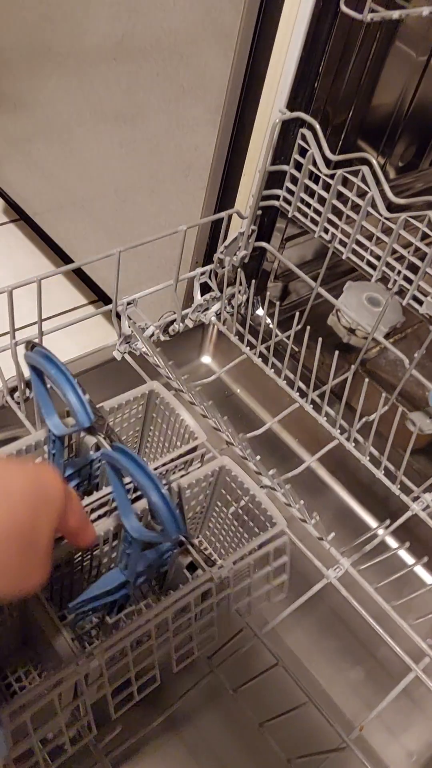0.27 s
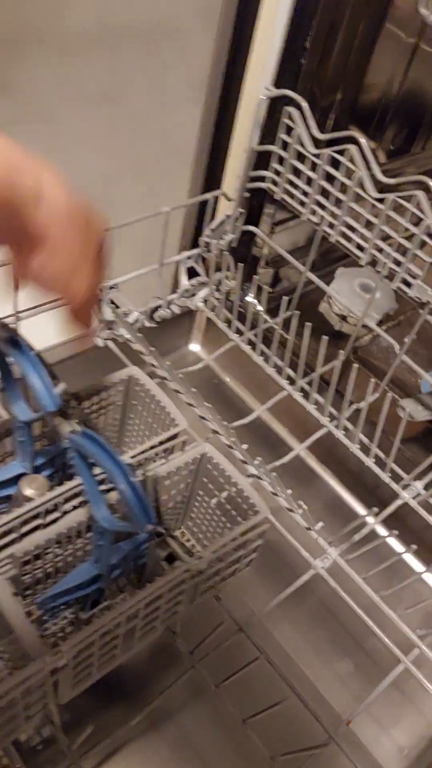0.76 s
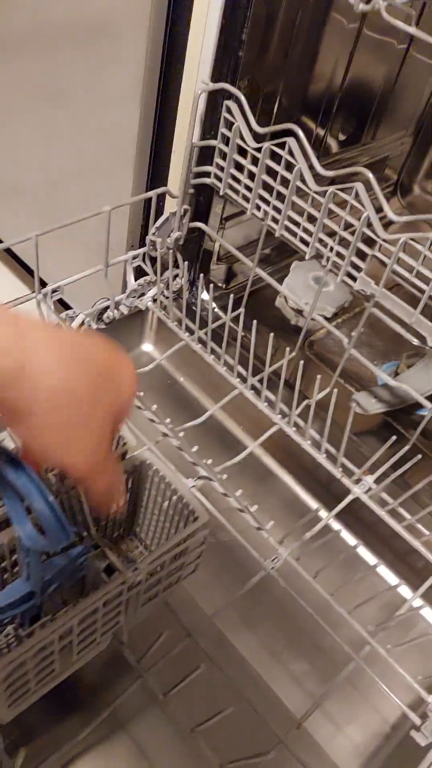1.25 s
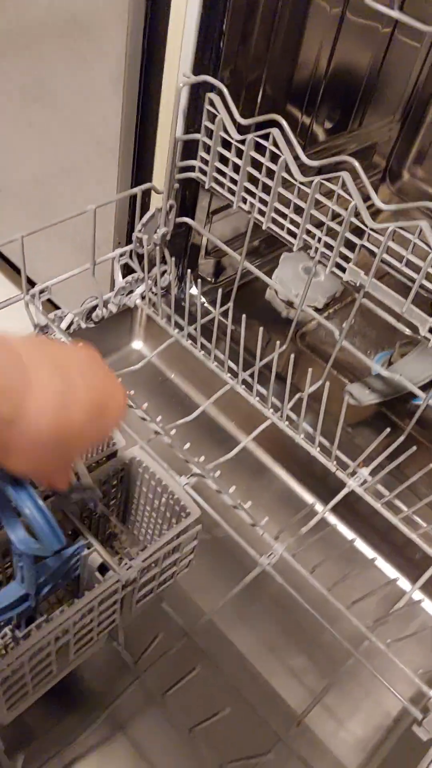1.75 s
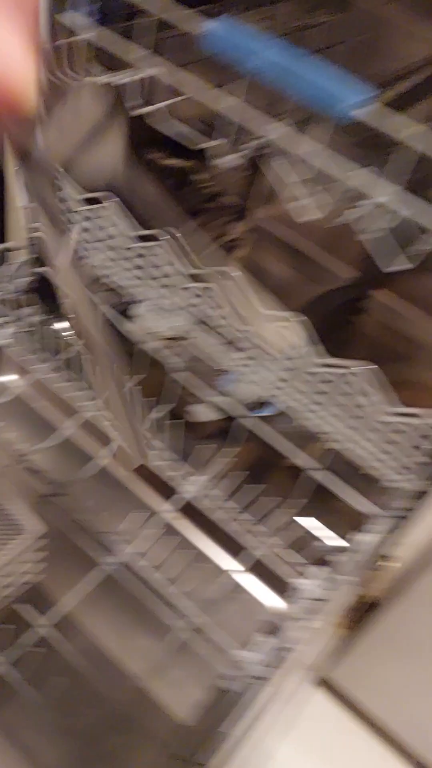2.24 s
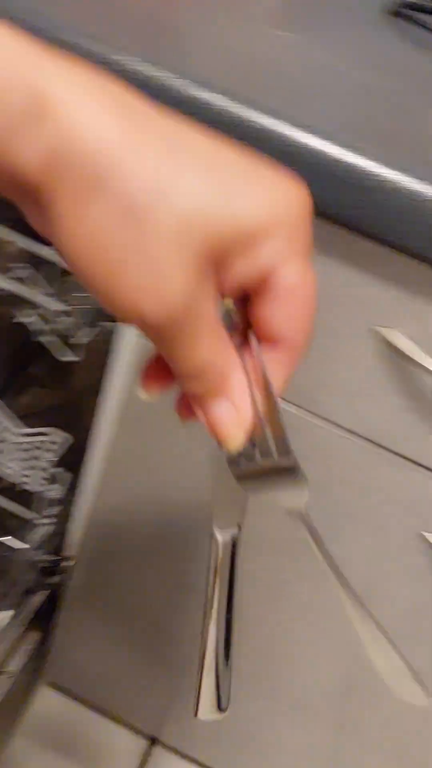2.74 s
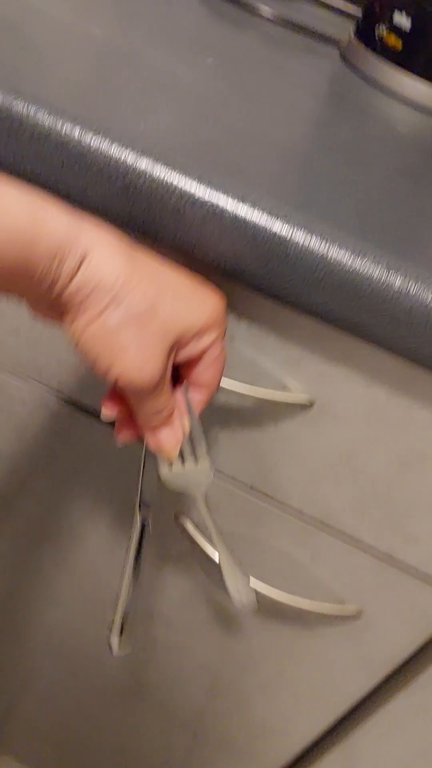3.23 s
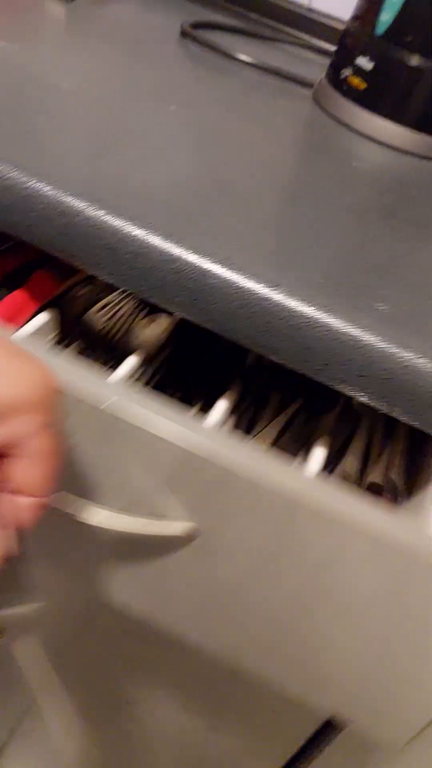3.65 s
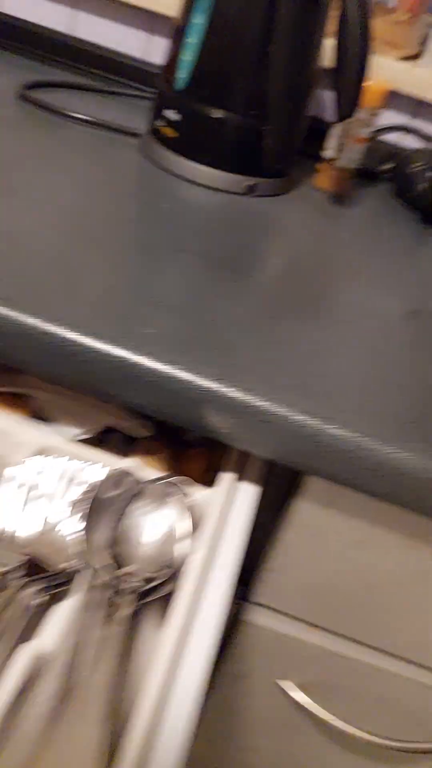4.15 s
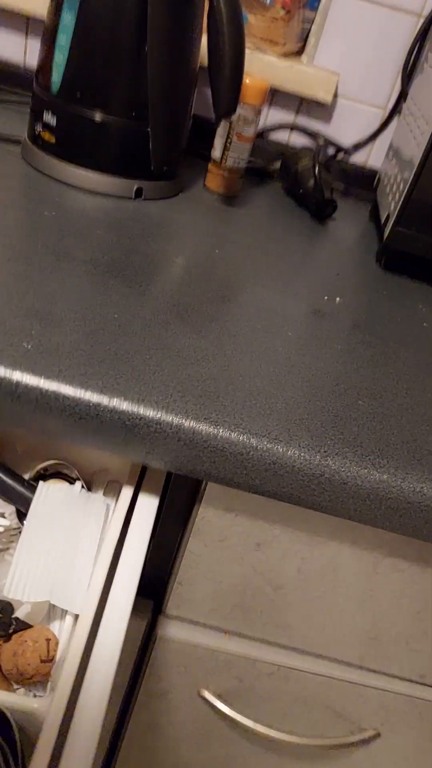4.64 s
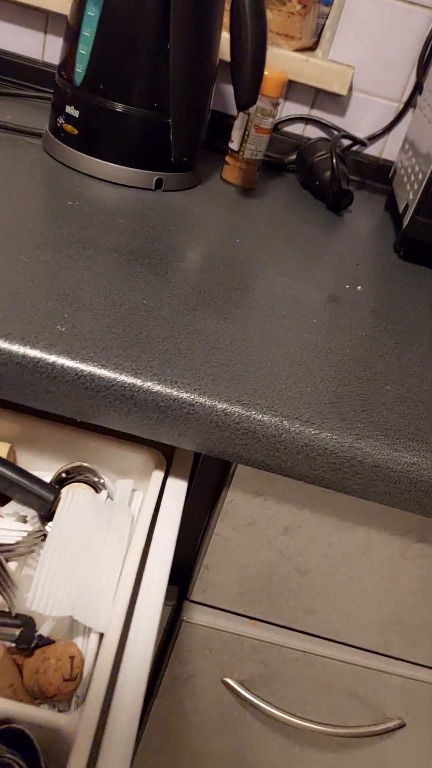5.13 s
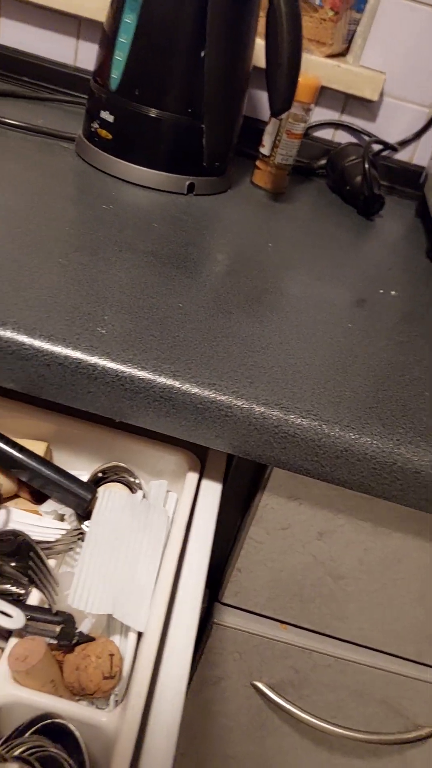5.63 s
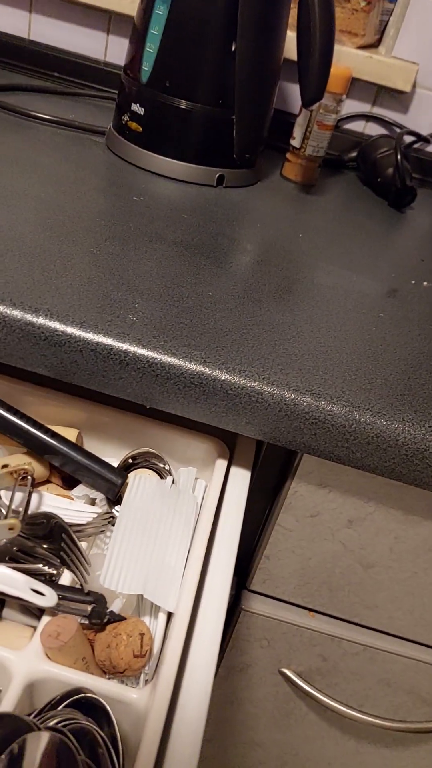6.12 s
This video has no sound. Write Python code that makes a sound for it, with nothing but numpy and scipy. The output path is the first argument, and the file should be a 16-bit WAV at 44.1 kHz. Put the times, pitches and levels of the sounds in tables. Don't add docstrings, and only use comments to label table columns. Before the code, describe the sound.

In a small hard kitchen, a cutlery basket slams onto a dishwasher's wire rack with a booming metallic clatter and rocks to rest. Light knocks and scrapes follow as knife and fork are pulled out and tick together. A drawer rattles loose, rolls open and thuds against its stop, then the fork and knife clink into a hollow plastic tray. A close handheld stereo microphone catches short room reflections.

```python
import sys
import numpy as np
from scipy import signal
from scipy.fft import rfft, irfft
from scipy.io import wavfile

SR = 44100
rng = np.random.default_rng(int(sys.argv[2]) if len(sys.argv) > 2 else 0)


def master(y):
    cut = np.clip(np.atleast_2d(y).T, -1, 1)
    pcm = np.round(cut * 32767)
    wavfile.write(sys.argv[1], SR, pcm.astype(np.int16))


def convert_level_to_amplitude(level_db):
    exponent = np.asarray(level_db, float) / 20
    return 10 ** exponent


N = 281358


def rms_one(x):
    return x / np.sqrt(np.mean(x ** 2) + 1e-20)


def in_time(rows, silent=False):
    s, *columns = np.transpose(rows)
    t = np.arange(N) / SR
    curves = [np.interp(t, s, column) for column in columns]
    if silent:
        outside_s = np.maximum(s[0] - t, 0) + np.maximum(t - s[-1], 0)
        curves[0] = curves[0] - 1500 * outside_s
    return curves


def band(x, low_hz, high_hz):
    sos = signal.butter(2, [low_hz, min(high_hz, .45 * SR)], "band", fs=SR, output="sos")
    return signal.sosfilt(sos, x + 1e-18)


def ring(x, hz, t60_s):
    r, w = convert_level_to_amplitude(-60 / (t60_s * SR)), 2 * np.pi * hz / SR
    return signal.lfilter([0, np.sin(w)], [1, -2 * r * np.cos(w), r * r], x + 1e-18)


def hollow(x, modes):
    out = 0
    for k, (hz, width_hz, level_db) in enumerate(modes):
        r = np.exp(-np.pi * width_hz / SR)
        poles = [1, -2 * r * np.cos(2 * np.pi * hz / SR), r * r]
        mode = signal.lfilter([(1 - r * r) / 2, 0, (r * r - 1) / 2], poles, x + 1e-18)
        out = out + (-1) ** k * convert_level_to_amplitude(level_db) * mode
    return out


def grains(per_s, spread_db):
    sizes = convert_level_to_amplitude(spread_db * np.minimum(rng.exponential(1, N), 4)) * rng.choice([-1, 1], N)
    return rms_one(sizes * (rng.random(N) < per_s / SR))


def swells(rows, flip=1):
    s, level_db, rise_s, fall_s = np.transpose(rows)[:, :, None]
    t = np.arange(0, N, 32) / SR
    before = 10 ** np.clip((s - t) / np.maximum(rise_s, .01), -30, 30)
    after = 10 ** np.clip((t - s) / np.maximum(fall_s, .02), -30, 30)
    signs = float(flip) ** np.arange(len(rows))
    return np.interp(np.arange(N) / SR, t, signs @ (convert_level_to_amplitude(level_db) / np.hypot(before, after)))


# frequency in Hz, density in dB per Hz.
ROOM_TONE = [(25, -30.5), (48, -4.5), (138, -9), (182, -17), (238, -7), (430, -19.5), (831, -30),
             (16500, -43)]


def air():
    level_db = -70
    hz = np.fft.rfftfreq(N, 1 / SR) + 1
    tone_hz, tone_db = np.transpose(ROOM_TONE)
    shape = convert_level_to_amplitude(np.interp(np.log(hz), np.log(tone_hz), tone_db))
    mid, side = rfft(rng.standard_normal((2, N)))
    apart = np.clip(hz / 900, .2, 1)
    return convert_level_to_amplitude(level_db) * rms_one(irfft(shape * (mid + apart * side * [[1], [-1]]), N))


# centre in Hz, t60 in seconds, level in dB.
ROOM_BANDS = [(152, .45, 5), (460, 0.27, 2), (1510, 0.28, 3.5), (4644, 0.3, -5), (7700, 0.2, -4.5),
              (14600, 0.17, -2.5)]


def kitchen(x):
    tail_s, level_db = .6, 2.5
    t, tail = np.arange(int(tail_s * SR)) / SR, 0
    centres = np.array(ROOM_BANDS)[:, 0]
    edges = np.r_[40, np.sqrt(centres[1:] * centres[:-1]), 19000]
    for (hz, t60_s, band_db), low_hz, high_hz in zip(ROOM_BANDS, edges, edges[1:]):
        mid, side = rng.standard_normal((2, len(t)))
        pair = mid + min((hz / 1000) ** 2.0, 1) * side * [[1], [-1]]
        tail = tail + convert_level_to_amplitude(band_db - 60 * t / t60_s) * band(pair, low_hz, high_hz) / np.sqrt(t60_s)
    tail = tail * np.clip((t - .002) / 0.0022, 0, 1)
    tail = tail / np.sqrt(np.sum(tail ** 2) / 2)
    return convert_level_to_amplitude(level_db) * signal.fftconvolve(x[None], tail, axes=1)[:, :N]


# time in seconds, left over right in dB, left lag in samples.
PLACES = [(0, -2.5, -9), (1, -1.5, -9.5), (1.7, -1, -12.5), (2.2, 6, -9), (2.8, 9.5, 8.5), (3.3, 8, -10),
          (4.2, -0.5, -12), (4.7, -4, 12.5), (5.3, 4.5, 13.5), (6.38, 0.5, 7.5)]


def placed(x):
    pan_db, lag = in_time(PLACES)
    n = np.arange(N)
    return np.array([convert_level_to_amplitude(k * pan_db / 2) * np.interp(n - np.round(k * lag / 2), n, x) for k in (1, -1)])


# time in seconds, level in dB, seconds to rise 20 dB, seconds to fall 20 dB.
LOADS = [(0.0, -42, -0.4, 0.05), (.15, -28.5, 0.08, 0.07), (.286, -30, -0.23, 0.16),
         (1.13, -56.5, 0.6, -0.7), (1.3, -41, 0.13, 0.18), (1.558, -45, -0.04, 0.1),
         (1.834, -52, -0.13, 0.3), (3.59, -47.5, 0.09, 0.08), (3.9, -55.5, 0.63, 1.6),
         (4.845, -27.5, 0, 0.1538), (4.99, -35, 0.12, .1), (5.385, -38.5, 0.05, -0.06)]


def cabinet():
    mid, side = band(band(rng.standard_normal((2, N)), 48, 190), 48, 190)
    return convert_level_to_amplitude(-1.5) * swells(LOADS) * rms_one(mid + convert_level_to_amplitude(-12) * side * [[1], [-1]])


# frequency in Hz, wander in Hz.
WALL_MODES = [(211, 1.1), (237, 2.2)]
# time in seconds, level in dB, seconds to fall 20 dB.
WALL_SHOVES = [
    [(0.0, -45.5, 0.7), (.15, -24, 0.17), (.22, -24.5, 0.28), (.39, -30, 0.21), (.54, -36, 0.1859),
     (1.15, -48, -0.6), (1.32, -40.5, 0.13), (1.5, -47.5, 0.53), (1.75, -47.5, 0.35), (1.98, -49, 0.02),
     (2.2, -61, 0.3)],
    [(0.0, -45, 0.9), (.13, -30.5, 0.23), (.22, -24.5, 0.07), (.35, -27, 0.23), (.47, -31, 0.38),
     (.58, -30, 0.4), (.72, -34, .2), (.86, -42.5, 0.36), (1.15, -46, -0.9), (1.3, -45, 0.31),
     (1.6, -41, 0.2347), (1.76, -44.5, 0.26), (1.96, -44.5, 0.18), (2.19, -56, -0.2), (2.55, -64.5, 0.1)],
]


def tub():
    rise_s, level_db = 0.054, 0.5
    out = 0
    for (hz, wander_hz), shoves in zip(WALL_MODES, WALL_SHOVES):
        wander = rms_one(band(rng.standard_normal(N), 2, 9))
        swing = swells([(s, db, rise_s, fall_s) for s, db, fall_s in shoves], flip=-1.003)
        hum = np.sqrt(2) * np.sin(2 * np.pi * np.cumsum(hz + wander_hz * wander) / SR)
        out = out + convert_level_to_amplitude(level_db) * swing * hum
    return out


# time in seconds, level in dB, seconds to rise 20 dB, seconds to fall 20 dB, bright part in dB re level.
BASKET_STROKES = [(0.0, -42.5, 0.15, 0.5155, -16), (0.113, -27, -0.66, 0.16, -3),
                  (0.219, -19.5, 0.015, 0.1318, 1), (1.12, -54, -0.06, -0.2, -3),
                  (1.233, -48.5, -0.37, 0.1, 3), (1.291, -71.5, 0.5, -0.21, -22),
                  (1.731, -81.5, 0.18, -0.3, -9), (1.948, -60.5, 0.56, -0.2445, -8),
                  (2.029, -58.5, 0.2, -0.37, 5)]
AIR_STROKES = [(2.35, -79, .02, 0.082, 14.3), (2.528, -73, .06, 0.14, 10.3), (2.68, -70, 0.105, 0.084, 2.5),
               (2.942, -66, 0.055, 0.053, 14.3), (3.161, -62.5, 0.022, 0.059, 3.7),
               (4.09, -59, 0.1, 0.081, 4.2), (4.29, -52.5, 0.091, 0.11, 8.4)]


def rubbing():
    fine = grains(8600, 3.9)
    middle = rms_one(band(fine, 1100, 4200))
    bright = rms_one(band(fine[::-1], 3100, 20000))
    dull = rms_one(band(fine[::-1], 180, 610))
    strokes = [(*row, 11.5 - 0.32 * (row[1] + 50)) for row in BASKET_STROKES]
    strokes += [(*row, -7.5) for row in AIR_STROKES]
    middle_gain = swells([(s, db, rise, fall) for s, db, rise, fall, _, _ in strokes])
    bright_gain = swells([(s, db + more, rise, fall) for s, db, rise, fall, more, _ in strokes])
    dull_gain = swells([(s, db + more, rise, fall) for s, db, rise, fall, _, more in strokes])
    return convert_level_to_amplitude(-6) * (middle_gain * middle + bright_gain * bright + convert_level_to_amplitude(-10.0) * dull_gain * dull)


# time in seconds, level in dB.
ROLLING = [(3.42, -80), (3.572, -56.5), (3.724, -51.5), (3.806, -48.5), (4.27, -51), (4.62, -54.5),
           (4.788, -51.5), (4.82, -44)]
# time in seconds, level in dB, rise in seconds, fall in seconds.
FRONT_RATTLES = [
    (3.806, -38, 0.03, 0.06),
    (4.82, -47, 0.062, .02),
]


def drawer():
    shut_db, opens_s = 13, 0.2
    rail_db, rail_start_s = -76, 3.5
    level_db, = in_time(ROLLING, silent=True)
    start_s = ROLLING[0][0]
    out_s = np.clip(np.arange(N) / SR - start_s, 0, 2)
    cavity_hz = 243.5 + 113 * np.minimum(out_s, 0.95)
    panel_hz = 997 - 190 * out_s
    bumps, modes = grains(900, 3.0), 0
    for hz, width_hz, mode_db in ((cavity_hz, 65, 0), (1.297 * cavity_hz, 90, -8),
                                  (panel_hz, 50, -8), (1.393 * panel_hz, 160, -12)):
        turn = np.exp(2j * np.pi * np.cumsum(hz) / SR)
        r = np.exp(-np.pi * width_hz / SR)
        mode = (signal.lfilter([1], [1, -2 * r, r * r], bumps / turn) * turn).real
        closed_db = shut_db * (hz[0] < 400) * np.exp(-(out_s / opens_s) ** 2)
        modes = modes + convert_level_to_amplitude(mode_db - closed_db) * rms_one(mode)
    rumble = convert_level_to_amplitude(3.5) * rms_one(band(bumps, 150, 572))
    rattle = convert_level_to_amplitude(-12.0) * swells(FRONT_RATTLES) * rms_one(band(band(bumps, 700, 2400), 910, 2084))
    sliding = (level_db > -80) * (out_s > rail_start_s - start_s)
    hiss = convert_level_to_amplitude(rail_db - 3) * rms_one(band(rng.standard_normal(N), 2200, 11000)) * sliding
    return convert_level_to_amplitude(level_db - 7.5) * (modes + rumble) + rattle + hiss


# time in seconds, peak in dB.
FORK_TICKS = [
    (2.3361, -31),
    (2.4249, -53),
    (2.4902, -39),
    (2.5651, -35),
]
# frequency in Hz, level in dB, t60 in seconds.
TICK_BLADE_MODES = [(2800, -12, .03), (7500, -4, .012), (11090, -12, .09), (12630, -8, .015)]


def ticks():
    t = np.arange(N) / SR
    touch = sum(convert_level_to_amplitude(db - 60 * np.maximum(t - s, 0) / .005) * (t >= s) for s, db in FORK_TICKS)
    strike = np.maximum(np.diff(touch, prepend=0), 0)
    rings = sum(convert_level_to_amplitude(db - 10) * ring(strike, hz, t60_s) for hz, db, t60_s in TICK_BLADE_MODES)
    contact = band(touch * rng.choice([-1, 1], N), 5500, 17000)
    return band(contact + rings, 2200, 18000)


def blows(events, steel, body, steel_db):
    snap_db, click_db = 6.5, 10
    ring_follows = 0.55
    ring_jolts = 900
    chatter, t = grains(12000, 1.8), np.arange(SR // 4) / SR
    clack, edge, knock = np.zeros((3, N))
    struck = np.zeros((len(steel), N))
    share = rng.uniform(-0.61, 1, (len(events), len(steel), 2))
    for (s, level_db, edge_db, knock_db, t60_s), shares in zip(events, share):
        i, t60_s = round(s * SR), max(t60_s, .002)
        shape = (convert_level_to_amplitude(-60 * t / t60_s) * np.minimum(t / (0.055 * t60_s), 1))[:N - i]
        after = t[:len(shape)]
        shape = shape * (.6 + 1.2 * np.exp(-after / .002))
        here = slice(i, i + len(shape))
        burst, other = shape * chatter[here], shape * chatter[::-1][here]
        burst, other = (convert_level_to_amplitude(level_db) * b * np.sqrt(shape @ shape / (b @ b)) for b in (burst, other))
        clack[here] += burst
        edge[here] += convert_level_to_amplitude(edge_db) * other
        knock[here] += convert_level_to_amplitude(knock_db) * other * convert_level_to_amplitude(-60 * after / 0.019)
        jolts = other[:ring_jolts] / np.sqrt(other[:ring_jolts] @ other[:ring_jolts])
        ring_db = steel_db + ring_follows * edge_db
        mode_gain = convert_level_to_amplitude(level_db + ring_db + 4 + 4 * shares[:, 0]) * np.sign(shares[:, 1])
        struck[:, i:i + len(jolts)] += np.outer(mode_gain, jolts)
        knock[i] += convert_level_to_amplitude(level_db + knock_db + snap_db)
        clack[i] += convert_level_to_amplitude(level_db + click_db) * np.sign(shares[0, 1])
    flutter = convert_level_to_amplitude(5 * rms_one(band(rng.standard_normal(N), 12, 70)))
    rings = sum(convert_level_to_amplitude(db - 9) * np.roll(flutter, round(hz)) * ring(x, hz, t60_s)
                for x, (hz, db, t60_s) in zip(struck, steel))
    edges = convert_level_to_amplitude(-3.5) * (band(edge, 4700, 26000) + band(edge, 12000, 26000))
    bright = convert_level_to_amplitude(-3.0) * band(clack, 1300, 6000) + edges + rings
    dull = convert_level_to_amplitude(18.5) * hollow(knock, body)
    return np.array([bright + dull, bright + .45 * dull])


# frequency in Hz, width in Hz, level in dB.
RACK_BLOWS = [(0.0817, -33, -14, -5.5, 0.04), (0.098, -27.5, -5.5, -11.5, 0.025),
              (0.1087, -19, -10.5, -14, 0.055), (0.14, -23, -8.5, -2.5, 0.036),
              (0.117, -29, -14.5, 9, 0.011), (0.167, -23.5, -8.5, -3.5, 0.018),
              (0.19, -15.5, -5, -11, 0.023), (0.1972, -3, -7.5, -8.5, 0.041),
              (0.2065, -6, -12.5, -8, 0.049), (0.218, -11, -10, -5.5, 0.062),
              (0.2494, -9.5, -18.5, -5, 0.046), (0.254, -10.5, -13, -30, 0.029),
              (0.267, -13, -14, -11.5, 0.03), (0.2863, -16, -11.5, -18.5, 0.24),
              (0.3204, -31.5, -10.5, 6.5, 0.023), (0.3582, -22.5, -14, 2, 0.064),
              (1.0914, -39, -34, -2.5, 0.043), (1.2196, -29.5, -13, -7.5, 0.035),
              (1.2396, -35, -7, -11, 0.027), (1.262, -30, -20, -10, 0.022),
              (1.2729, -24.5, -14, -7.5, 0.049), (1.279, -28, -13, -12.5, 0.013)]
RACK_STEEL = [(1163, -17, .2), (1500, -16, .15), (2130, -13, .07), (3080, -9, .1), (3192, -13, .3),
              (4479, -3, .04), (4700, -3, .05), (5195, -8, .04), (7321, -14, .2)]
BASKET_BODY = [(115, 56, 3.5), (325, 45, 11.5), (432, 76, 11), (473, 190, 6), (1170, 480, -4.5)]
# time in seconds, clack peak in dB.
ROCKING = [(0.4918, -33), (0.5206, -32), (0.56, -41), (0.61, -41), (0.6536, -39), (0.7141, -38.5),
           (0.8009, -45), (0.9015, -47)]


def basket_on_rack():
    touches = [(s, db, -11 - 3.5 * k, -13, 0.028) for k, (s, db) in enumerate(ROCKING)]
    return blows(RACK_BLOWS, RACK_STEEL, BASKET_BODY, -12) + blows(touches, RACK_STEEL, BASKET_BODY, 1.5)


PULL_BLOWS = [
    (1.529, -49, 1.8, -10.5, 0.028),
    (1.5355, -36.5, 0.9, -6.5, 0.012),
]
HELD_STEEL = [(4900, -8, .09), (6650, 0, .04), (6966, -8, .07), (7900, -12, .06), (11360, -10, .07),
              (12700, -5, .1), (13020, -10, .07), (13710, -11, .07), (14300, -4, .08), (14750, -3, .07)]
HAND_BLOWS = [(0.9861, -30, -0.5, -23, 0.0047), (1.7022, -46, -16, 0.5, 0.019), (1.764, -41, -20, 5, 0.019),
              (1.8894, -47.5, -13, 3, 0.0057), (1.93, -34.5, -23, -11.5, 0.045),
              (2.0003, -37.5, -6, -5.5, 0.0066), (3.158, -43.5, -23.5, -15, 0.0058)]
BLADE_STEEL = [(6900, -7, .07), (11090, 0, .1), (11400, -12, .06), (12630, -14, .03)]


def cutlery_in_hand():
    pulled = blows(PULL_BLOWS, HELD_STEEL, BASKET_BODY, -1.5)
    return pulled + blows(HAND_BLOWS, BLADE_STEEL, BASKET_BODY, -9.5)


HANDLE_BLOWS = [(3.7707, -27.5, 8, -2, 0.14), (3.7855, -26.5, 0, 5, 0.13), (4.0727, -47, -3, 0.5, 0.042),
                (4.797, -43, -22, -0.5, 0.045), (4.817, -28.5, -10, -7, 0.066),
                (4.8233, -16.5, -11.5, 2.5, 0.074), (4.8295, -5.5, -11.5, 0, 0.042),
                (4.836, -9, -5.5, -4, 0.024), (4.8445, -9.5, 0, -4, 0.022), (4.8554, -23.5, 11, -21, 0.048),
                (4.872, -17.5, 2, -13.5, 0.14), (5.0158, -20, -28, -2, 0.011),
                (5.131, -27, 4, -10.5, 0.036), (5.1676, -25, 5, -5, 0.025)]
FORK_STEEL = [(770, -26, .45), (4689, -20, .1), (6019, -22, .12), (7951, -13, .2), (9510, -11, .14),
              (10020, -15, .08), (11085, -6, .14), (11200, -11, .05), (12340, -12, .08), (12710, -6, .16),
              (14357, -5, .14), (14733, -10, .06), (15470, -12, .07)]
DRAWER_BOX = [(320, 137, -0.8), (507, 78, 0.055), (854, 176, 0.88), (1390, 320, -0.15), (1524, 270, -0.35)]
NUDGE_BLOWS = [
    (6.2925, -38.5, 2.5, -21, 0.032),
    (6.2985, -35, 0.5, -5, 0.037),
    (6.3286, -28.5, -8.5, 3, 0.044),
    (6.342, -42, 2, 1, 0.08),
]
NUDGE_STEEL = [(9900, -9, .1), (11250, 0, .07), (12780, 0, .07), (14200, -3, .12), (15600, -8, .06)]


def drawer_blows():
    return blows(HANDLE_BLOWS, FORK_STEEL, DRAWER_BOX, -14) + blows(NUDGE_BLOWS, NUDGE_STEEL, DRAWER_BOX, 1.5)


FORK_BLOWS = [ (5.2283, -31.5, -0.5, -6, 0.0091), (5.2782, -35.5, -8, -11, 0.036),
              (5.3017, -25, 6, -13.5, 0.036), (5.3254, -24, -3, -8, 0.04),
              (5.3357, -8.5, -13.5, -4, 0.0184), (5.3554, -19, -15, -26, 0.03),
              (5.3629, -13.5, 4, -5, 0.031), (5.3787, -19, 9.5, -23.5, 0.045), (5.3904, -19, 6, -14, 0.035),
              (5.4, -23, 5, -20, 0.034), (5.417, -14, -6, -0.5, 0.026), (5.4413, -21.5, 8.5, -22, 0.025),
              (5.4589, -9.5, -9, -11, 0.022), (5.481, -27.5, 6, -21, 0.037),
              (5.498, -28.5, 6.5, -21, 0.072), (5.538, -32, 6, -23, 0.067), (5.629, -26.5, -10, -17, 0.039),
              (5.6855, -18.5, -3.5, -20, 0.021)]
KNIFE_BLOWS = [(5.8083, -29, 9.5, -11.5, 0.032), (5.822, -33.5, 12, -2, 0.059),
               (5.8377, -17.5, -2.5, -6.5, 0.032), (5.858, -40, 11, -23, 0.05),
               (5.8794, -32.5, 6.5, 5, 0.032), (5.8875, -23, -16, -1.5, 0.056),
               (5.9276, -31.5, -7, -22, 0.023), (5.9725, -23, 7.5, -28, 0.036),
               (5.9808, -17, -24, -7, 0.022), (5.9859, -18.5, -13, -2, 0.05), (5.991, -23.5, 0, -8, 0.0072),
               (6.0082, -29, 10, -30, 0.066), (6.0462, -25.5, -1.5, -19, 0.058),
               (6.058, -19.5, -5, -6, 0.049), (6.0714, -25, -16, -2, 0.02), (6.0899, -31, -3, -27, 0.12),
               (6.137, -35, -16, -3, 0.03), (6.175, -39, -22, 0.5, 0.015)]
KNIFE_STEEL = [(3451, -20, .07), (7960, -14, .07), (9700, -12, .06), (11170, -7, .06), (11290, -10, .04),
               (12600, -10, .045), (12720, -8, .06), (12830, -8, .05), (14150, -9, .05), (14390, -7, .055),
               (15480, -11, .05)]
TRAY_BODY = [(343, 170, -4.5), (606, 396, 2), (757, 260, 4), (1260, 260, -6.5)]


def cutlery_in_tray():
    return blows(FORK_BLOWS, FORK_STEEL, TRAY_BODY, -6) + blows(KNIFE_BLOWS, KNIFE_STEEL, TRAY_BODY, -2)


def scene():
    struck = basket_on_rack() + cutlery_in_hand() + drawer_blows() + cutlery_in_tray()
    direct, sent = struck + rubbing() + drawer()
    hand = ticks()
    return air() + kitchen(sent + convert_level_to_amplitude(-9) * hand) + cabinet() + placed(direct + hand + tub())


def top_cut(x):
    return signal.sosfilt(signal.butter(12, 16800, fs=SR, output="sos"), x)


def record(dry):
    rounded = 0.95 * np.tanh(dry / 0.74)
    mix = signal.sosfilt(signal.cheby2(16, 60, 16300, fs=SR, output="sos"), rounded)
    return top_cut(mix)


dry = scene()
out = record(dry)
master(out)
```